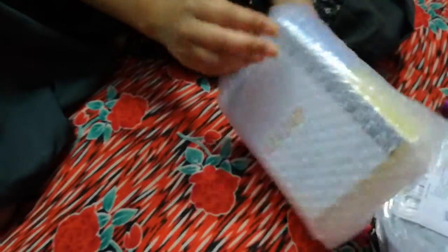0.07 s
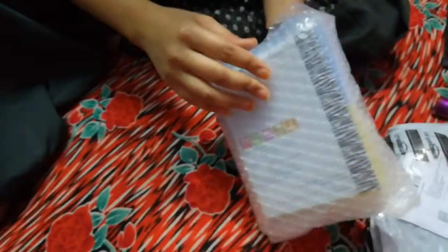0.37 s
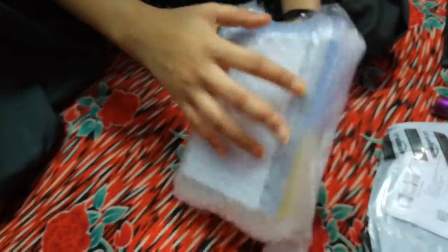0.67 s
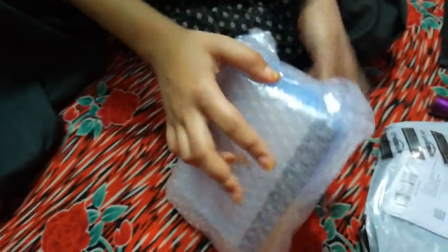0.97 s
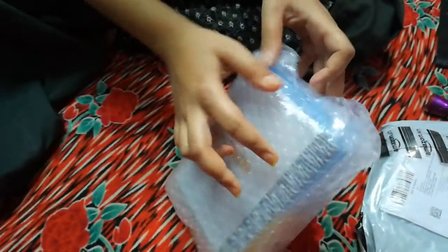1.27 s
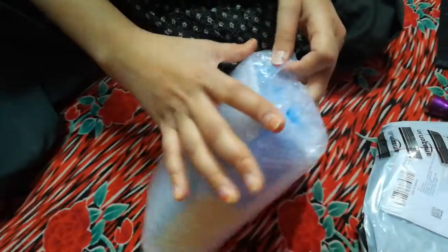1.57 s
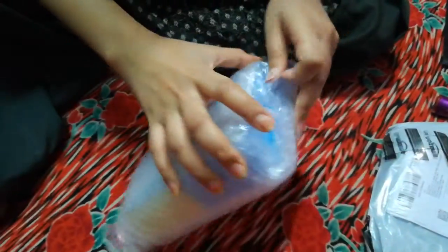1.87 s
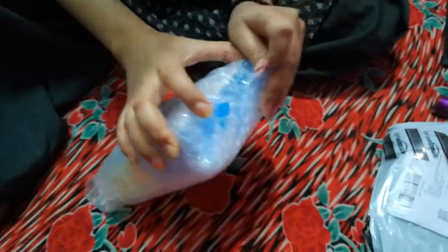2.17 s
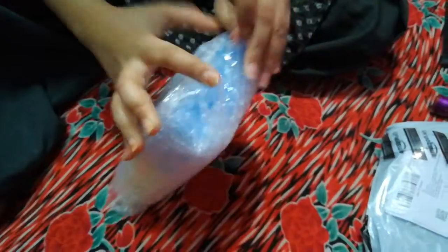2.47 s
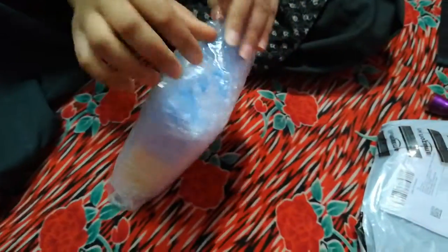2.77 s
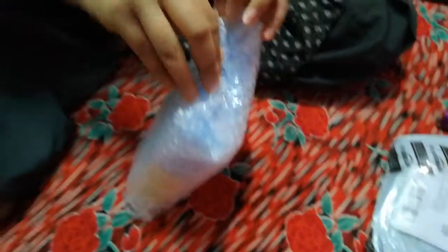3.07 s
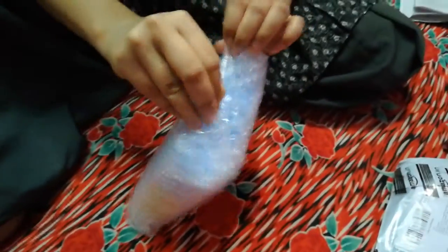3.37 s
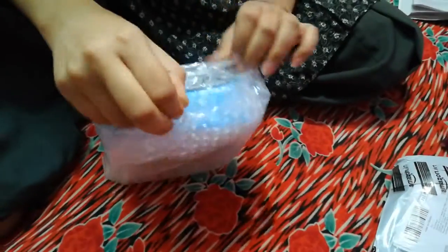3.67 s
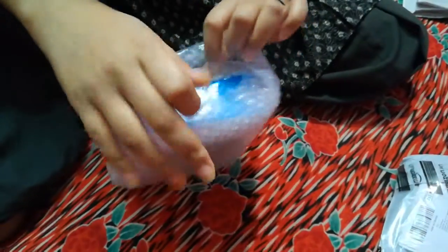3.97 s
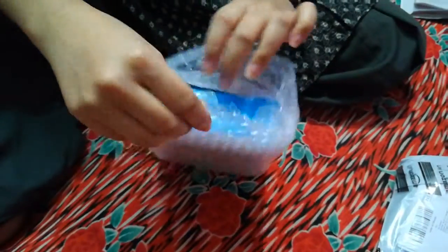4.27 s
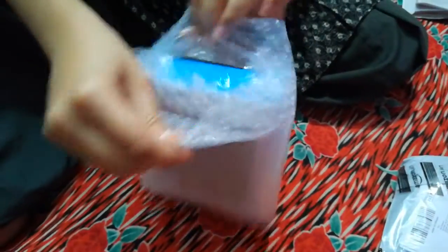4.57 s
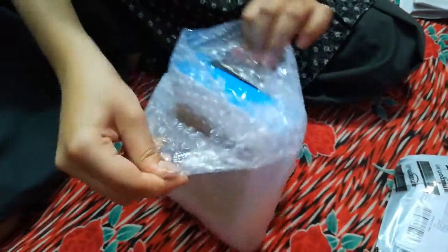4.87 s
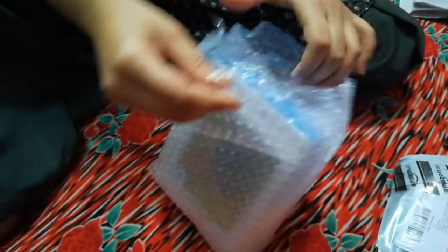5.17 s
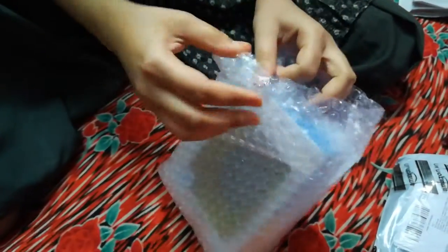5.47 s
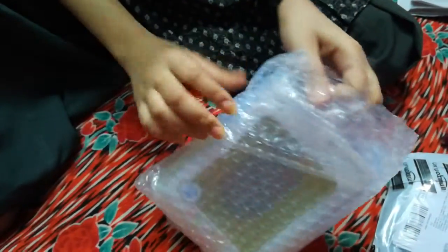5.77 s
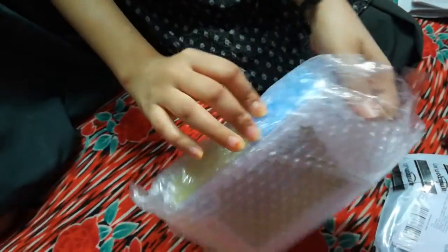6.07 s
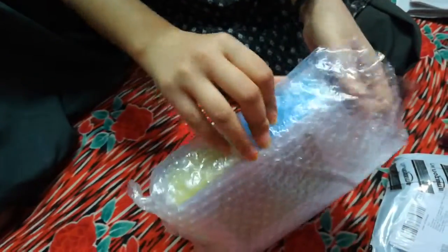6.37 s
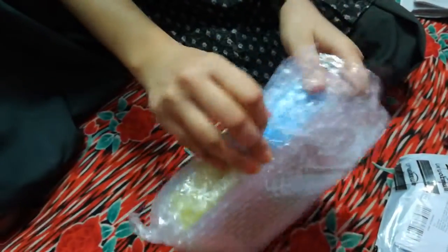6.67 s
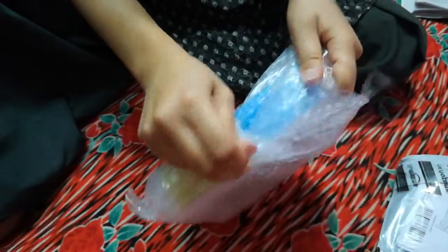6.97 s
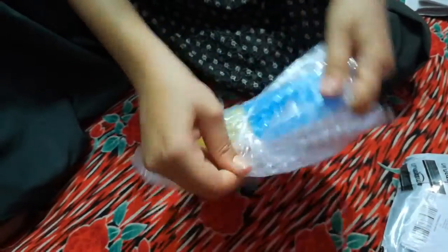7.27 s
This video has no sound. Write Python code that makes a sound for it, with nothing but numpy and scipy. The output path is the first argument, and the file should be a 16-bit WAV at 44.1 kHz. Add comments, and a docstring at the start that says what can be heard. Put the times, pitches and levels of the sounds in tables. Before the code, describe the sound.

Close by in a small room, hands turn a box in bubble wrap, making faint crinkles, dull rubbing and scattered ticks. Midway the wrap gives way in a loud run of cracks with a soft bump, and the box slides against the film with a faint high hiss. More crinkling follows, with a dry knock on cardboard, one faint squeak and a sharp crackle near the end. A low, wavering hum lies underneath.

```python
"""Bubble wrap crinkles faintly over a low, wavering hum: hands turn a boxed item on a bed, in a small room.
Each squeeze or pull crinkles the film and drags bubbles over the box; creases buckle and snap one by one.
Midway the wrap gives way in a loud run of cracks, and the box slides against the film with a high hiss.
The box bumps softly, a finger knocks on the cardboard, and film squeaks once on film."""
import sys
import numpy as np
from scipy import signal
from scipy.fft import rfft, irfft
from scipy.io import wavfile
from scipy.ndimage import uniform_filter1d

SR = 44100
rng = np.random.default_rng(int(sys.argv[2]) if len(sys.argv) > 2 else 0)


def transcribe(signal):
    """Save signal, clipped to [-1, 1], as a 16-bit WAV file at the path in sys.argv[1]."""
    frames = np.atleast_2d(signal).T
    limited = np.clip(frames, -1, 1)
    pcm = np.round(limited * 32767).astype(np.int16)
    wavfile.write(sys.argv[1], SR, pcm)


N = 327205


def gain_of(db):
    """Decibels to amplitude."""
    return 10 ** (np.asarray(db) / 20)


def unit_rms(x):
    """Scales to rms 1."""
    return x / np.sqrt(np.mean(x ** 2) + 1e-20)


def steadied(x, window_samples=1323):
    """Removes slow level swings, keeps the grain."""
    return x / np.sqrt(abs(uniform_filter1d((x ** 2).mean(0), window_samples)) + 1e-12)


def at_hz(table, hz):
    """Interpolates a table over log frequency."""
    table_hz, value = np.transpose(table)
    return np.interp(np.log(hz + 1), np.log(table_hz + 1), value)


def per_sample(table):
    """Interpolates a table over time."""
    return np.interp(np.arange(N) / SR, *np.transpose(table))


def add(mix, start_s, sound):
    """Mixes a sound in at start_s."""
    part = mix[:, max(round(start_s * SR), 0):][:, :sound.shape[1]]
    part += sound[:, :part.shape[1]]


def colour(x, spectrum, fft_size=2048):
    """Minimum-phase filter: attacks stay sharp."""
    log_gain = np.log(gain_of(at_hz(spectrum, abs(np.fft.fftfreq(fft_size, 1 / SR)))))
    taps = np.fft.ifft(np.exp(np.conj(signal.hilbert(log_gain)))).real[:fft_size // 2]
    return signal.oaconvolve(x, taps[None], axes=1)[:, :x.shape[1]]


def band_noise(centre_hz, width_hz):
    """Noise in one resonance, rms 1."""
    hz = np.fft.rfftfreq(N, 1 / SR)
    return unit_rms(irfft(rfft(rng.standard_normal(N)) / (1 + (2 * (hz - centre_hz) / width_hz) ** 2), N))


# diffuse field between the microphones: (frequency [Hz], coherence [ratio])
COHERENCE = [(60, 1), (130, 1.0139), (290, 0.84), (620, -0.71), (1300, 0.3265), (2500, 0), (16000, 0)]

def diffuse(pair):
    """Two independent signals become a diffuse field at two close microphones."""
    a, b = rfft(pair)
    coherence = np.clip(at_hz(COHERENCE, np.fft.rfftfreq(pair.shape[1], 1 / SR)), -1, 1)
    return irfft([a, coherence * a + np.sqrt(1 - coherence ** 2) * b], pair.shape[1])


# position of the wrap: (time [s], right microphone lag [samples])
WRAP_LAG = [(1, 3), (2.8, 4.5), (3.3, 3), (4.5, 3), (5.6, -2.5), (6.5, -3.5), (7.1, 1.5)]

def placed(pair, time_s, width=0.784):
    """A near sound reaches the microphones equally loud, slightly apart in time and waveform."""
    lag = round(float(np.interp(time_s, *np.transpose(WRAP_LAG))))
    left = unit_rms(pair[0] + width * pair[1])
    right = unit_rms(pair[0] - width * pair[1])
    return np.array([np.roll(np.pad(left, 16), -lag // 2), np.roll(np.pad(right, 16), lag // 2)])


# beating hum tones: (frequency [Hz], level [dB])
HUM_TONES = [(46.5, -61), (53.6, -55)]
# hum swells: (centre [s], level [dB])
HUM_SWELLS = [(0.35, -49), (2.29, -45), (3.42, -41), (3.8, -45.5), (4.19, -43), (4.82, -40), (5.35, -43.5),
              (5.98, -43), (6.75, -48)]
# room noise: (frequency [Hz], gain [dB])
AIR_SPECTRUM = [(26, -22), (45, -3.5), (129, -7), (170, -8.5), (465, -15.5), (609, -16), (798, -16),
                (1550, -27.5), (2190, -20), (2600, -24.5), (4800, -27.5), (7110, -35), (14900, -44.5),
                (16000, -53.5)]

def background(swell_s=0.365, swell_hz=51.12, waver_hz=2.217, rumble_db=-62, drone_db=-60, air_db=-57):
    """A low hum beats and swells over rumble, a faint drone and room hiss."""
    t = np.arange(N) / SR
    swell = sum(gain_of(db) * np.cos(np.pi * np.clip((t - centre_s) / swell_s, -.5, .5)) ** 2
                for centre_s, db in HUM_SWELLS)
    tones = [(hz, gain_of(db)) for hz, db in HUM_TONES] + [(swell_hz, swell)]
    hum = sum(np.sqrt(2) * rms * np.sin(2 * np.pi * np.cumsum(hz + waver_hz * band_noise(0, 14.14)) / SR)
              for hz, rms in tones)
    rumble = gain_of(rumble_db) * band_noise(swell_hz, width_hz=26)
    drone = gain_of(drone_db) * band_noise(centre_hz=119, width_hz=12.9)
    air = colour(diffuse(rng.standard_normal((2, N))), AIR_SPECTRUM, fft_size=8192)
    return hum + rumble + drone + gain_of(air_db) * unit_rms(air)


# room decay: (frequency [Hz], t60 [s])
ROOM_T60 = [(150, 0.0047), (500, 0.494), (1100, 0.2569), (2000, 0.2953), (4000, 0.32), (9000, 0.1739),
            (15000, 0.2942)]
# echo colour: (frequency [Hz], gain [dB])
ECHO_SPECTRUM = [(100, 11), (240, 0.5), (335, 0), (430, 7), (600, 0.5), (820, -2.5), (1000, -5), (2000, 1),
                 (4000, -2.5), (15000, -2)]

def reflections(build_s=0.000936, early_boost=0.37, early_s=0.0075):
    """Echoes from hands, bed and walls: strong at first, each band dying at its own rate."""
    t = np.arange(SR // 2) / SR
    taps = rng.standard_normal((2, len(t))) * (rng.random((2, len(t))) < .2)
    hz, frame_s, bands = signal.stft(taps, SR, nperseg=256)
    decay = gain_of(-60 * frame_s / at_hz(ROOM_T60, hz)[:, None])
    tail = signal.istft(bands * decay, SR, nperseg=256)[1][:, :len(t)]
    onset = (1 - np.exp(-(t / build_s) ** 2)) * (1 + early_boost * np.exp(-t / early_s))
    spectrum = rfft(tail * onset)
    spectrum /= np.sqrt(uniform_filter1d(abs(spectrum) ** 2, size=100))  # whiten
    spectrum *= gain_of(at_hz(ECHO_SPECTRUM, np.fft.rfftfreq(len(t), 1 / SR)))
    return diffuse(irfft(spectrum, len(t)))[:, :SR // 3]


def room(x, wet_db=-1, patterns=4, patterns_per_s=5):
    """Small-room reverberation; echo patterns crossfade in a cycle to keep its tone even."""
    position = np.arange(N) / SR * patterns_per_s
    out = np.zeros((2, N))
    for k in range(patterns):
        distance = abs((position - k + patterns / 2) % patterns - patterns / 2)
        fade = np.cos(np.pi / 2 * np.minimum(distance, 1))
        out += signal.oaconvolve(x * fade, reflections(), axes=1)[:, :N]
    return gain_of(wet_db) * out


# box sliding out: (time [s], level [dB])
SLIDE_LEVEL = [(3.6, -100), (3.8, -62.5), (4.08, -57.5), (4.28, -61), (4.36, -68.5), (4.52, -59.5),
               (4.8, -100)]
# sliding hiss: (frequency [Hz], gain [dB])
SLIDE_SPECTRUM = [(2500, -34), (4600, 5), (6500, -16), (8500, 3), (9600, -2.5), (10500, -29.5),
                  (16000, -30)]

def slide():
    """Smooth film dragged over the smooth box: an even, high hiss."""
    hiss = unit_rms(colour(rng.standard_normal((2, N)), SLIDE_SPECTRUM))
    return hiss * gain_of(per_sample(SLIDE_LEVEL))


# film sliding on film: (time [s], relative level [dB])
SQUEAK_LEVEL = [(5.8, -110), (5.95, -65), (6.05, -49), (6.12, -51.5), (6.18, -50.5), (6.28, -61),
                (6.36, -110)]
# squeak resonances: (frequency [Hz], width [Hz], gain [dB])
SQUEAK_MODES = [(955, 116, -4), (4244, 290, -2.5), (4570, 350, -7), (5150, 215, -6)]

def squeak(gain_db=-4, judder_db=4):
    """Film sticks and slips on film: a faint, scratchy whistle."""
    whistle = np.array([sum(gain_of(db) * band_noise(hz, width_hz) for hz, width_hz, db in SQUEAK_MODES)
                        for _ in 'LR'])
    judder = gain_of(judder_db * band_noise(0, 250))
    return unit_rms(whistle * judder) * gain_of(per_sample(SQUEAK_LEVEL) + gain_db)


# box bumps: (time [s], relative level [dB], pitch [Hz])
BUMPS = [(0.495, -45, 211.5), (0.724, -42.5, 165.3), (0.747, -43.5, 233.3), (3.059, -41.5, 257.3),
         (3.26, -45.5, 341.5), (3.301, -45, 159), (3.446, -23, 335), (3.458, -28, 175), (3.474, -29, 260),
         (3.522, -31.5, 337.4), (3.795, -44.5, 159.6), (3.939, -40.5, 208.8), (4.658, -36, 320),
         (5.624, -37.5, 190), (6.457, -39.5, 173), (6.632, -35, 140), (6.64, -39, 300),
         (6.84, -43.5, 226.5)]
# scuff of a bump: (frequency [Hz], gain [dB])
SCUFF_SPECTRUM = [(60, -17), (120, 0), (220, -7.5), (340, 10.5), (480, -13.5), (700, -14), (2500, -58.5)]

def bumps(scuff_gain=0.59, gain_db=-3, decay_s=0.008):
    """The padded box hits hands and bedding: a few dull cycles and a low scuff."""
    out, t = np.zeros((2, N)), np.arange(4096) / SR
    for time_s, db, hz in BUMPS:
        scuff = unit_rms(colour(rng.standard_normal((1, len(t))), SCUFF_SPECTRUM))
        thud = np.sin(2 * np.pi * hz * t) + scuff_gain * scuff
        envelope = np.exp(-t / decay_s) * (1 - np.exp(-t * hz * 2))
        add(out, time_s, gain_of(db + gain_db) * thud * envelope)
    return out


# box wall modes: (frequency [Hz], t60 [s], level [dB])
WALL_MODES = [(232.5, 0.0236, -32.5), (887, 0.0124, -33.5), (994, 0.022, -27.5)]

def knock(time_s=5.6277):
    """A finger slips off the wrap and knocks on the cardboard, short and dry."""
    out, t = np.zeros((2, N)), np.arange(SR // 20) / SR
    ring = sum(gain_of(db - 60 * t / t60_s) * np.sin(2 * np.pi * hz * t) for hz, t60_s, db in WALL_MODES)
    add(out, time_s, ring[None])
    return out


# squeezes and pulls: (start [s], length [s], film level [dB], rub level [dB])
STROKES = [(0.071, 0.0915, -61, -71.5), (0.457, 0.082, -65.5, -72), (0.671, 0.084, -57, -55.5),
           (0.871, 0.285, -67.5, -68.5), (1.275, 0.157, -54, -65), (1.486, 0.128, -56, -60),
           (1.824, 0.178, -55.5, -60), (1.94, 0.2384, -55.5, -55.5), (2.422, 0.038, -62.5, -59.5),
           (2.813, 0.0995, -50, -56), (2.896, 0.198, -52.5, -60.5), (3.021, 0.1493, -48.5, -58),
           (3.201, 0.237, -48.5, -62), (3.597, 0.197, -51, -60), (3.884, 0.131, -50.5, -57),
           (4.038, 0.096, -48, -54.5), (4.12, 0.166, -55, -60), (4.346, 0.175, -58.5, -58.5),
           (4.518, 0.079, -48, -51.5), (4.586, 0.0847, -39, -43), (4.853, 0.058, -64, -72.5),
           (5.016, 0.22, -52, -56), (5.271, 0.0845, -47.5, -59.5), (5.363, 0.0432, -47, -48.5),
           (5.482, 0.05, -50, -54.5), (5.527, 0.1175, -45.5, -54.5), (5.762, 0.0475, -56, -61),
           (5.894, 0.197, -52, -52), (6.16, 0.187, -62.5, -63.5), (6.355, 0.079, -46.5, -52.5),
           (6.418, 0.111, -45, -51.5), (6.567, 0.21, -43, -48.5), (6.754, 0.1735, -48.5, -52.5),
           (7.208, 0.0344, -57, -53.5), (7.303, 0.122, -58, -61)]
# wrap springing loose: (start [s], film level [dB], rub level [dB], decay [s])
FLURRIES = [(3.263, -34.5, -37.5, 0.0373), (3.471, -24.5, -26, 0.0263), (3.513, -33, -29.5, 0.0346),
            (7.014, -29.5, -36.5, 0.0242)]

def handling(grip_s=0.0405, relax_s=0.0452, hold_film_db=-69, hold_rub_db=-63):
    """Film and rub envelopes: the powers of holding, strokes and flurries add."""
    t = np.arange(SR) / SR
    power = gain_of([[hold_film_db], [hold_rub_db]]) ** 2 * np.ones(N)
    for start_s, length_s, film_db, rub_db in STROKES:
        envelope = np.minimum(t / grip_s, 1) * np.exp(-np.maximum(t - length_s, 0) / relax_s)
        add(power, start_s, (gain_of([[film_db], [rub_db]]) * envelope) ** 2)
    for start_s, film_db, rub_db, decay_s in FLURRIES:
        add(power, start_s, (gain_of([[film_db], [rub_db]]) * np.exp(-t / decay_s)) ** 2)
    return np.sqrt(power)


def grains(base_per_s, spread_db, low_hz, high_hz, decay_cycles, pitches):
    """Countless tiny creases tick in clumps, each kind at its own pitch."""
    out, t = np.zeros((2, N)), np.arange(256) / SR
    clumps = np.exp(.5 * band_noise(0, 120))
    chance = clumps * base_per_s / pitches / SR
    for hz in np.geomspace(low_hz, high_hz, pitches):
        size = gain_of(spread_db * np.minimum(rng.exponential(1, N), 3.5))
        impulses = size * rng.choice([-1, 1], N) * (rng.random(N) < chance)
        age = t * hz / decay_cycles
        tick = age * np.exp(-age) * np.sin(2 * np.pi * (hz * t + rng.random((2, 1))))
        tick = placed(tick, rng.uniform(0, N / SR)) * np.sqrt(hz)
        out += signal.oaconvolve(impulses[None], tick, axes=1)[:, :N]
    return out


# crinkling film: (frequency [Hz], gain [dB])
FILM_SPECTRUM = [(500, -14), (1500, -10), (2500, -6.5), (3600, 0.5), (5000, 2), (6600, -1), (9000, -6),
                 (10500, -12.5), (13000, -16.5), (16000, -19)]
# bubbles rubbing the box: (frequency [Hz], gain [dB])
RUB_SPECTRUM = [(80, -10), (200, -1.5), (340, -3), (560, -11.5), (780, -2.5), (1000, 0.5), (1300, 4),
                (1650, -2), (2200, 0.5), (2800, -15), (5000, -33), (12000, -46)]

def crinkle(film_envelope, rub_envelope, film_db=-2, rub_db=-3, friction_gain=0.558):
    """Thin film crackles brightly; bubbles dragged over the box give a duller rustle."""
    creases = grains(3000, spread_db=6.57, low_hz=1492, high_hz=14360, decay_cycles=0.88, pitches=30)
    friction = friction_gain * rng.standard_normal((2, N))
    film = steadied(colour(unit_rms(creases) + friction, FILM_SPECTRUM))
    bubbles = grains(2400, spread_db=2.76, low_hz=166.8, high_hz=4185, decay_cycles=0.548, pitches=24)
    rub = steadied(colour(bubbles, RUB_SPECTRUM))
    return film * film_envelope * gain_of(film_db) + rub * rub_envelope * gain_of(rub_db)


# hollow of the wrapped box: (frequency [Hz], t60 [s], gain [dB])
HOLLOW_MODES = [(283, 0.0375, -15), (923.6, 0.0444, -1.5), (1183.4, 0.0154, 13.5), (1590, 0.012, -11),
                (1955, 0.0182, 0), (1954, 0.0091, -3.5)]
# mid, high and top bands of a snap: (frequency [Hz], gain [dB])
CRACK_SPECTRUM = [(300, -24.5), (700, -24.5), (1500, -3.5), (2300, 3.5), (3000, -2.5), (4000, 2.5),
                  (5200, -0.5), (6500, -19.5), (8500, -25.5), (16000, -18.5)]
SIZZLE_SPECTRUM = [(2000, -32.5), (5500, 1), (7000, -3), (9000, -2.5), (10300, -13), (12000, -35.5),
                   (16000, -28.5)]
FIZZ_SPECTRUM = [(3000, -50.5), (8500, -1.5), (10500, 4.5), (13000, 2.5), (16000, -6)]

def snap(time_s, db, bright_db, hollow_db, buckle_s=0.0002464, flutter_s=0.00196):
    """A crease buckles in about a millisecond, the film flutters and the hollow beneath rings."""
    film_radiation_db, hollow_radiation_db = 0.5, -1
    t = np.arange(1024) / SR
    buckle = t / buckle_s * np.exp(1 - t / buckle_s)
    flutter = 0.523 * np.exp(-t / flutter_s) * (1 - np.exp(-t / buckle_s))
    grip_detune = rng.uniform(.95, 1.05, len(HOLLOW_MODES))
    ring = np.zeros(len(t))
    for k, (hz, t60_s, mode_db) in enumerate(HOLLOW_MODES):
        polarity = (-1) ** (k // 2)
        ring += polarity * gain_of(mode_db - 60 * t / t60_s) * np.sin(2 * np.pi * hz * grip_detune[k] * t)
    sound = gain_of(hollow_db + hollow_radiation_db) * placed(np.array([ring, 0 * ring]), time_s)
    for spectrum, lift_db in [(CRACK_SPECTRUM, -bright_db / 2), (SIZZLE_SPECTRUM, bright_db / 2),
                              (FIZZ_SPECTRUM, -9 + 0.2 * bright_db)]:
        burst = colour((buckle + flutter) * rng.choice([-1., 1.], (2, len(t))), spectrum)
        sound += gain_of(db + film_radiation_db + lift_db) * placed(burst, time_s)
    return np.sqrt(132 / len(t)) * sound  # levels refer to the energy packed into 3 ms


# main creases: (time [s], level [dB], sizzle over crack [dB], hollow level [dB])
SNAPS = [(0.4941, -53, -5.5, -49), (1.3363, -43, 4, -55.5), (1.374, -47, 11.5, -67.5),
         (1.416, -51, -5.5, -65.5), (1.5068, -48.5, -4, -57.5), (2.3592, -57, 5.5, -62),
         (2.668, -61.5, -11, -66), (2.7926, -54.5, 11.5, -59), (2.9719, -48.5, 2, -53),
         (3.011, -48, -1, -61), (3.0583, -49.5, -18, -48), (3.2326, -42, -4.5, -50.5),
         (3.2635, -30.5, -7, -27), (3.301, -31, -2.5, -32), (3.386, -40, 4.5, -43), (3.426, -43, 2.5, -64),
         (3.4435, -28, 2.5, -17.5), (3.4491, -27, -9, -19.5), (3.4586, -30, -5, -20),
         (3.4647, -17.5, 6.5, -15), (3.474, -25.5, 4.5, -19.5), (3.4772, -28.5, -13, -21.5),
         (3.483, -25, -7, -24), (3.6472, -45, 7.5, -54.5), (3.7004, -43.5, 17.5, -60),
         (3.7918, -55, -8, -44), (3.9359, -41, 7.5, -44.5), (4.026, -46.5, 7, -40.5),
         (4.068, -47, 14.5, -46.5), (4.6874, -38.5, 9, -43), (4.753, -44.5, 6, -51.5),
         (4.8822, -55, 4.5, -66), (5.023, -52.5, -6.5, -52.5), (5.1557, -42.5, -9.5, -37),
         (5.1958, -44, 6, -68.5), (5.2103, -47, -7.5, -51), (5.2767, -42.5, 1, -57.5),
         (5.391, -54.5, -17, -39.5), (5.6243, -41.5, -7.5, -45), (5.628, -32, -1, -31.5),
         (6.365, -45.5, 7, -64), (6.459, -41.5, -7, -45.5), (6.5745, -43, -5.5, -57.5),
         (6.6217, -35, -0.5, -55), (6.671, -35.5, 3.5, -60), (7.0035, -40.5, -8.5, -42),
         (7.0163, -34.5, -11.5, -44.5), (7.0235, -32.5, -1.5, -50.5), (7.034, -39, -5, -48),
         (7.237, -59, -9.5, -50)]

def snaps(film_envelope, strays=70, above_film_db=1, spread_db=2.2, ceiling_db=-45):
    """The main creases snap, plus small random ones sized by how hard the film is worked."""
    out = np.zeros((2, N))
    for time_s, db, bright_db, hollow_db in SNAPS:
        add(out, time_s - 22 / SR, snap(time_s, db, bright_db, hollow_db))
    for sample, (size, tone) in zip(rng.integers(0, N, strays), rng.standard_normal((strays, 2))):
        db = min(20 * np.log10(film_envelope[sample]) + above_film_db + spread_db * size, ceiling_db)
        add(out, sample / SR, snap(sample / SR, db, bright_db=2 + 5 * tone, hollow_db=db - 9))
    return out


def scene():
    """Wrap and box, their reflections and the background."""
    film_envelope, rub_envelope = handling()
    wrap = snaps(film_envelope) + crinkle(film_envelope, rub_envelope) + slide() + squeak()
    near = wrap + bumps() + knock()
    return near + room(near[:1]) + background()


# microphone balance: (frequency [Hz], left minus right [dB])
MIC_BALANCE = [(100, 0), (300, -1.5), (700, 3), (1300, -0.26), (2400, 1), (4400, 2), (8100, -4.5),
               (15000, 0.5)]

def record(dry, low_cut_hz=29, high_cut_hz=16000, peak_limit=.75):
    """Two microphones: own colour each, no deep bass, rounded peaks, band limit."""
    hz = np.fft.rfftfreq(N, 1 / SR)
    tilt_db = at_hz(MIC_BALANCE, hz) / 2
    low_cut = 1 - 1 / (1 + (hz / low_cut_hz) ** 6)
    coloured = irfft(rfft(dry) * gain_of([tilt_db, -tilt_db]) * low_cut, N)
    rounded = peak_limit * np.tanh(coloured / peak_limit)
    lowpass = signal.firwin(511, high_cut_hz, window=("kaiser", 9), fs=SR)
    return signal.oaconvolve(rounded, lowpass[None], "same")


dry = scene()
out = record(dry)
transcribe(out)
```